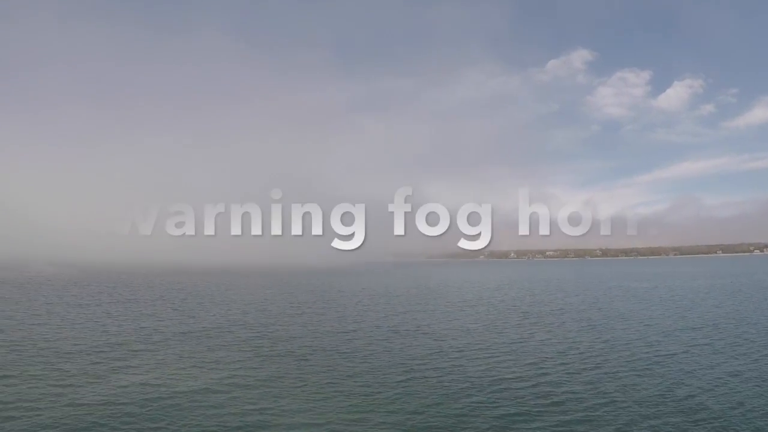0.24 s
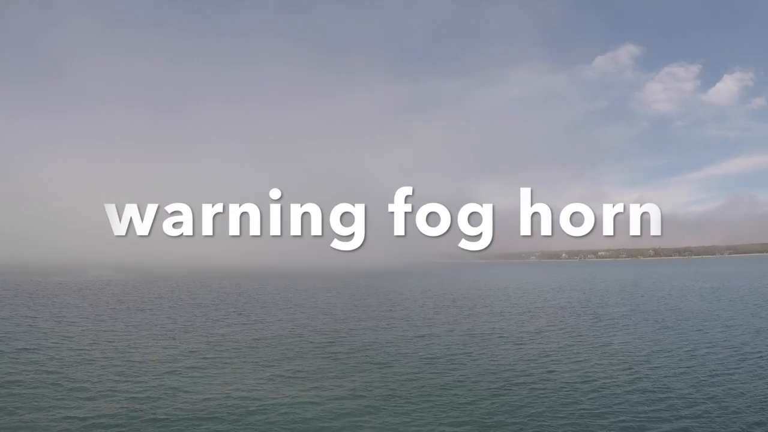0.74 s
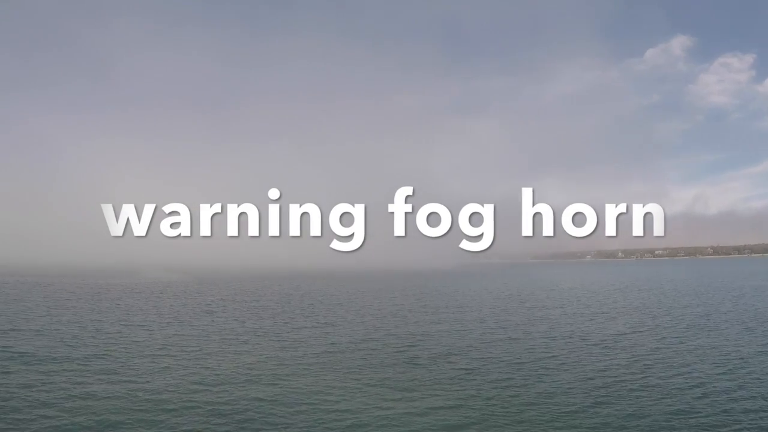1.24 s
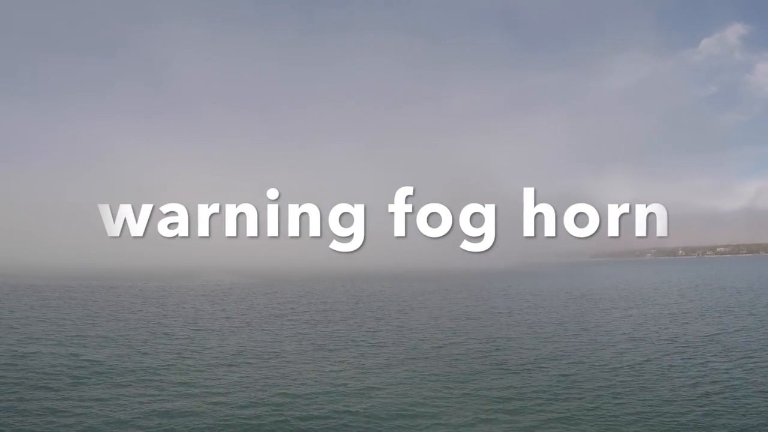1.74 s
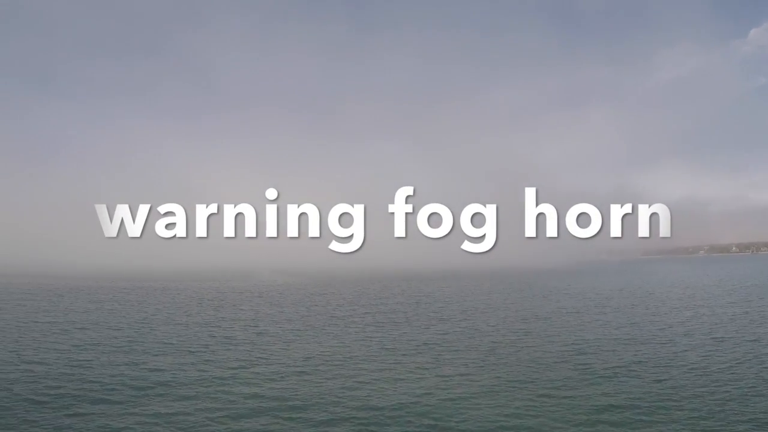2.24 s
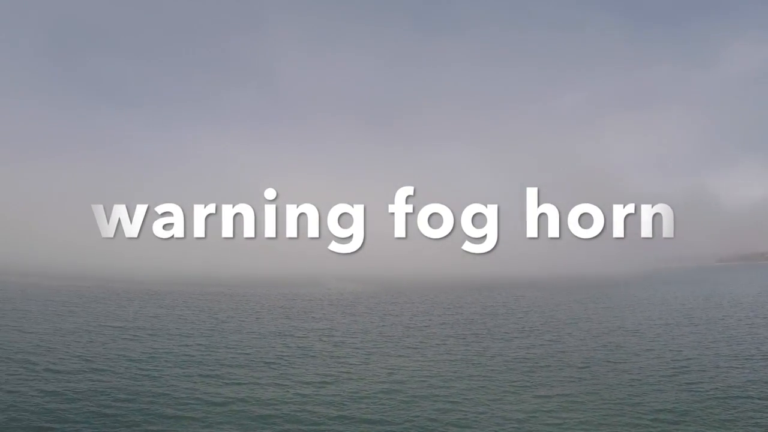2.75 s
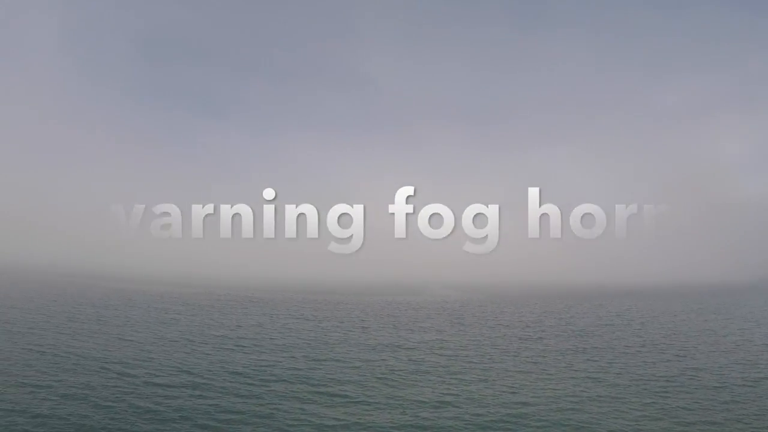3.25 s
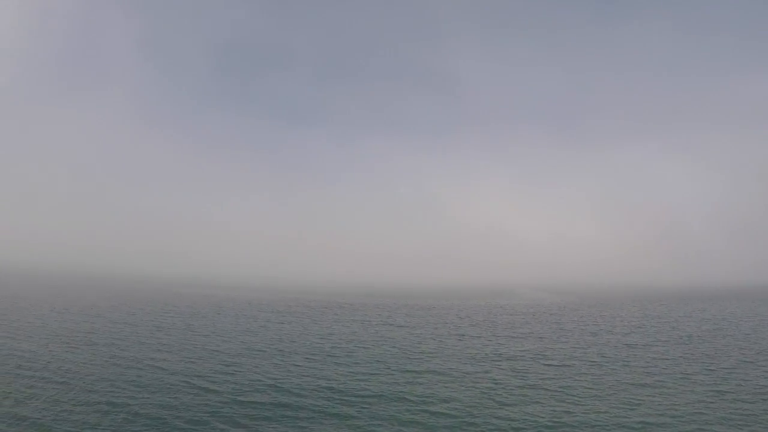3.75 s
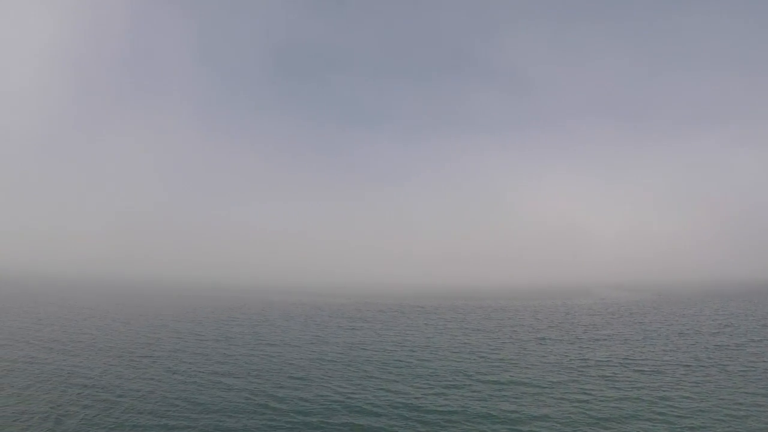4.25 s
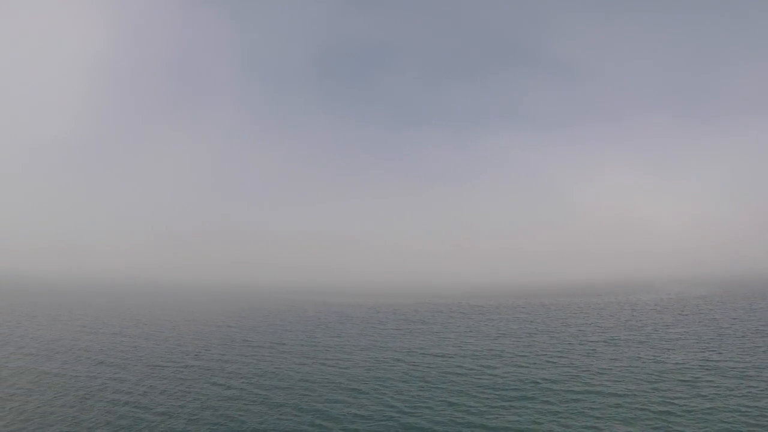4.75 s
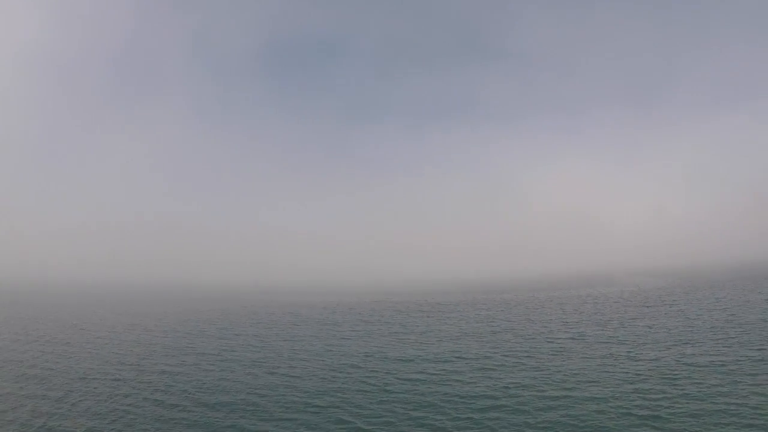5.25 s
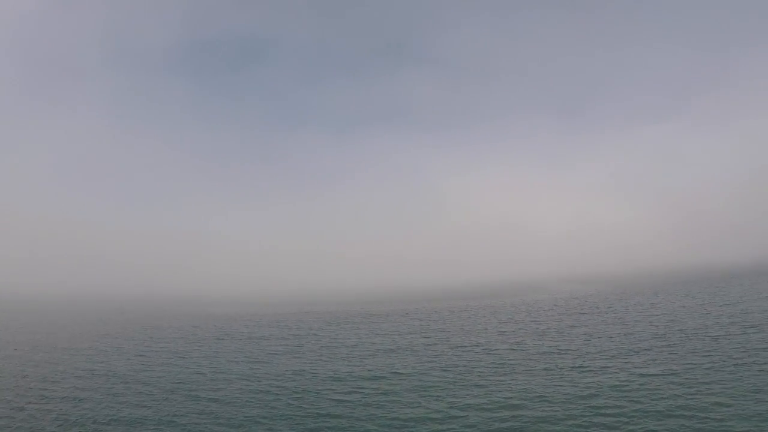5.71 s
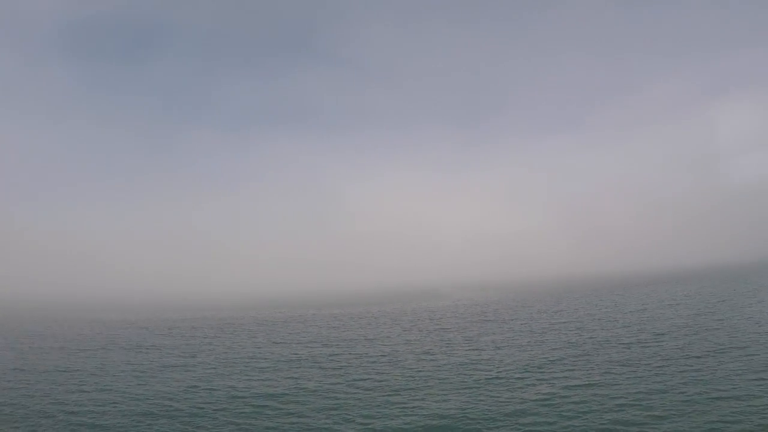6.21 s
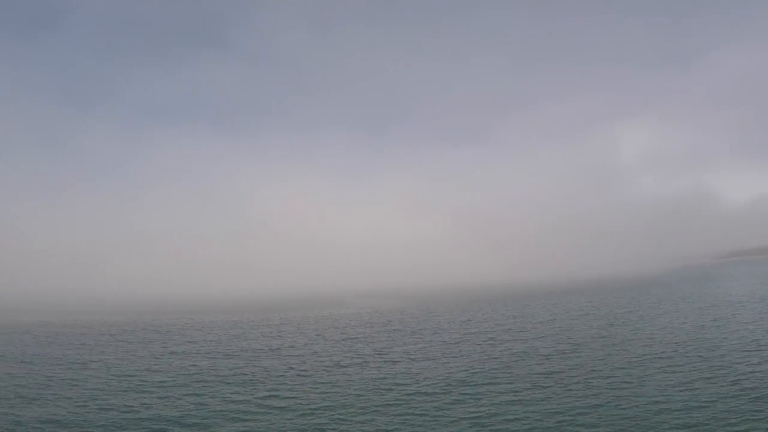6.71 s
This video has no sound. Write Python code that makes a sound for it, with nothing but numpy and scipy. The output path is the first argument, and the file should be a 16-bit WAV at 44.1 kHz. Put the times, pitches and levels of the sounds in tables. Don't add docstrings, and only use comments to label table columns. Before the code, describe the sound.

Open ship's deck over foggy water, with a bare microphone in strong wind. From 0 to 0.2 s several hard pops strike the microphone, over low, uneven rumbling and airy hiss. The gusts ease and return, with swells around 1.3 and 2 s, a lull near 2.5 s, and a faint, narrow fan hum behind. From about 3.4 s the wind hits more directly: throbbing low buffeting, a patter of small pops, and quick dry ticks from a loose fitting until about 4.6 s. At 4.7 s a powerful fog horn enters abruptly, bright and brassy for a fraction of a second, strongest near 5 s, then settling to one steady note around middle C. The wind quickly drops beneath it. Gusts add rough fuzz and flutter to the tone while its upper overtones fade in and out. The blast is still sounding when it cuts off near 7 s.

```python
import sys
import numpy as np
from scipy import signal
from scipy.fft import rfft, irfft, next_fast_len
from scipy.io import wavfile
from scipy.ndimage import uniform_filter1d, map_coordinates

SR = 44100
rng = np.random.default_rng(int(sys.argv[2]) if len(sys.argv) > 2 else 0)


def transcribe(u):
    v = np.clip(np.atleast_2d(u).T, -1, 1)
    q = np.round(v * 32767).astype(np.int16)
    wavfile.write(sys.argv[1], SR, q)


def volts(x):
    e = np.asarray(x, float) / 20
    return 10 ** e


N = 307377
T = np.arange(N) / SR


def unit(x):
    return x / np.sqrt(np.mean(x ** 2) + 1e-20)


def along(points, hz):
    f, v = np.transpose(points)
    return np.interp(np.log(hz + 1), np.log(f + 1), v)


def curves(rows):
    s, *cols = np.transpose(rows)
    return [np.interp(T, s, c) for c in cols]


def wobble(rate):
    steps = np.arange(0, N + 64, 64)
    knots = rng.standard_normal(400)
    drift = map_coordinates(knots, [steps * min(rate, 50) / SR])
    return np.interp(np.arange(N), steps, drift)


def rush(spectrum, patchy_db):
    z = signal.stft(rng.standard_normal(N + 512), nperseg=512)[2]
    patches = uniform_filter1d(rng.standard_normal(z.shape), size=6, axis=0)
    patches = uniform_filter1d(patches, size=10, axis=1)
    noise = signal.istft(z * volts(patchy_db * unit(patches)), nperseg=512)[1][:N]
    m = next_fast_len(N + 8192)
    hz = np.fft.rfftfreq(m, 1 / SR)
    inside = (hz > spectrum[0][0]) & (hz < spectrum[-1][0])
    colour = volts(along(spectrum, hz)) * inside
    return unit(irfft(rfft(noise, m) * colour, m)[:N])


# (time [s], level [dB])
BLOWING = [
    (4.69, -16),
    (4.71, -12),
    (4.725, -16.5),
    (4.8, -12.5),
    (4.93, -12),
    (5.0, -10.8),
    (5.1, -12.5),
    (6.5, -12),
    (6.7, -11),
]
HORN_START_S = BLOWING[0][0]


def horn():
    age = np.clip(T - HORN_START_S, 0, None)
    pitch_hz = 265.05 + 4 * np.exp(-age / 0.09)
    turn = 2 * np.pi * np.cumsum(pitch_hz) / SR
    blare = np.exp(-age / 0.23)
    fundamental = volts(curves(BLOWING)[0] + 0.47 * wobble(12)) * np.cos(turn)
    tone = fundamental + overtones(age, turn, blare) + top_overtones(age, turn, blare, pitch_hz[-1])
    opening = np.clip(age / 0.012, 0, 1)
    return opening * (np.sqrt(2) * tone + volts(8 * blare) * overload_fuzz(turn))


# (start level [dB], end level [dB], one cancellation [s], other cancellation [s], width [s])
OVERTONES = [(-22.5, -25, 4.4, 7.11, .25), (-30.5, -36.5, 6.3, 6.53, .14), (-33.5, -57.5, 5.62, 6.6, .14),
             (-35.5, -47, 5.8, 6.55, 0.14), (-44, -52, 4.98, 6.45, 0.2), (-59, -51.5, 6.4, 5.7, 0.07),
             (-57.5, -55, 6, 6.45, 0.15), (-61.5, -53, 5.25, 5.95, 0.18), (-59.5, -50, 5.25, 5.55, 0.28),
             (-65, -59.5, 5.7, 6.5, 0.098), (-60.5, -60, 5.3, 6.92, .22), (-65.5, -58, 5.5, 5.95, .2),
             (-65.5, -70, 5.5, 8.8, .15)]


def overtones(age, turn, blare):
    speak_s = 0.01
    lag = 0.5 + 3 * np.exp(-(age / 0.37) ** 4)
    locked = {2: 0.4, 3: lag, 5: lag}
    bell_db = 8 * np.exp(-(age / 0.2) ** 4)
    bell_db -= 12 * np.exp(-((age - 0.3) / 0.11) ** 2)
    out = np.zeros(N)
    for k, (start_db, end_db, early, late, width) in enumerate(OVERTONES, start=2):
        dips = [np.hypot(T - s, 0.072 * width) / np.hypot(T - s, width) for s in (early, late)]
        fading = np.prod(dips, axis=0)
        level_db = np.interp(T, [HORN_START_S, N / SR], [start_db, end_db])
        level_db += (min(0.33 * k, 1.6) + 3 * blare) * wobble(25)
        level_db += 7 * blare * (k > 2) + bell_db * (k == 3)
        speaks = np.clip(age / (k * speak_s), 0, 1)
        phase = locked.get(k, 2.5 * wobble(1.5))
        out += volts(level_db) * speaks * fading * np.cos(k * turn + phase)
    return out


# (frequency [Hz], level [dB])
TOP_OVERTONES = [(3900, -66), (4300, -69), (5200, -73), (6300, -76), (7100, -70), (7900, -75), (9500, -90)]


def top_overtones(age, turn, blare, held_hz):
    out = np.zeros(N)
    for k in range(15, 36):
        fading = np.abs(1 + 0.85 * np.exp(2.4j * wobble(4))) / 1.8
        level_db = along(TOP_OVERTONES, k * held_hz) + 7.9 * blare - 0.1 * k * age
        out += volts(level_db) * fading * np.cos(k * turn + 2.9 * wobble(2.4))
    return out


# (rate [Hz], level [dB per Hz])
SHAKE = [(15, -19), (35, 2.5), (55, -5), (85, -8), (105, -20), (130, -49)]
# (time [s], level [dB], overtone hit hardest [number])
CAPSULE_GUSTS = [(4.77, -47, 7), (4.93, -36, 3.1), (5.12, -39, 2), (5.55, -33, 1.5), (5.86, -48, 4.5),
                 (5.9, -47, 3), (6.03, -45, 4), (6.09, -48.5, 6), (6.18, -39, 2.2), (6.33, -39.5, 2.2),
                 (6.42, -45, 2.1), (6.62, -39.5, 2), (6.7, -38.5, 2.4), (6.76, -40.5, 2.7)]


def overload_fuzz(turn):
    gust_s, loss_db = 0.034, 10.5
    steady_db = [-48.5, -48.5, -55.0, -74.5, -58.0, -67.0, -64.5]
    shake = rush(SHAKE, patchy_db=1.5) + 1j * rush(SHAKE, patchy_db=1.5)
    out = np.zeros(N)
    for k, db in enumerate(steady_db, start=1):
        strength = volts(db)
        for s, gust_db, hardest in CAPSULE_GUSTS:
            strength = strength + volts(gust_db - loss_db * abs(k - hardest)) * np.exp(-((T - s) / gust_s) ** 2)
        smear = strength * np.roll(shake, k * SR // 3)
        out += np.real(smear * np.exp(1j * k * turn))
    return out


# (time [s], peak [dB], width [ms])
BUMPS = [(0.022, -18, 0.69), (0.027, -14, 1.8), (0.0331, -14, 0.97), (0.0349, -19, 0.26),
         (0.076, -26, 0.57), (0.118, -22, 0.74), (0.148, -15.5, 1.1), (0.172, -26, 0.3), (0.198, -13, 0.5),
         (3.58, -23, 0.37), (3.684, -24, 0.34), (3.705, -22, 0.56), (3.79, -19.5, 0.27), (4.027, -19, 0.52),
         (4.55, -21.5, 0.37)]


def pops():
    out, t = np.zeros(N + SR), np.arange(-300, 300) / SR
    when, size, wide = rng.random(size=(60, 3)).T
    patter_s = 3.45 + (4.68 - 3.45) * when
    patter_db = -30 + 3 * (2 * size - 1)
    patter_ms = 0.39 * (0.5 + wide)
    for s, db, width_ms in [*BUMPS, *zip(patter_s, patter_db, patter_ms)]:
        u = 1000 * t / width_ms
        dip = (1 - 0.6 * u ** 2) * np.exp(-u ** 2 / 2)
        out[round((s + 0.0012) * SR) - 300:][:len(t)] -= volts(db + 3) * dip
    return out[:N]


# (time [s], peak [dB], pitch [Hz])
TICKS = [(3.3809, -28, 1810), (3.466, -23.5, 1870), (3.5688, -26.5, 1790), (3.6892, -28.5, 1850),
         (3.757, -32.5, 1600), (3.798, -26, 1630), (3.8444, -29, 1850), (3.8885, -27, 1730),
         (3.92, -40, 1450), (3.985, -26, 1690), (4.074, -30, 1450), (4.155, -35.5, 1600),
         (4.265, -40, 2660), (4.436, -33, 1600), (4.525, -23, 1380), (4.524, -31.5, 2600),
         (4.593, -37, 2700), (4.885, -37, 1780), (5.5762, -39, 1850)]


def ticks():
    out, t = np.zeros(N + SR), np.arange(SR // 20) / SR
    for s, db, hz in TICKS:
        ratios = np.array([0.87, 1, 1.13]) + rng.normal(0, 0.03, 3)
        swing = sum(np.sin(2 * np.pi * hz * ratio * t) for ratio in ratios)
        decay = volts(db - 0.5 - 60 * t / 0.022)
        out[round(s * SR):][:len(t)] += decay * (1 - np.exp(-t / 0.0005)) * swing
    return out[:N]


# (time [s], strength [dB], grazing share that turns roar into hiss [0-1])
GUSTS = [(0.04, -51, 0.26), (0.2, -56.5, 0.3), (0.46, -51.5, 0.35), (0.9, -59.5, 0.28), (1.06, -60, 0.26),
         (1.33, -48, 0), (1.5, -54, 0.48), (1.72, -48, 0.44), (2.05, -46, 0.79), (2.46, -57.5, 0.42),
         (2.88, -56.5, 0.26), (3.0, -48.5, 0.46), (3.55, -45.5, 0.48), (4.0, -51, 0.08), (4.68, -48.5, -.1),
         (5.75, -52.5, .4), (6.22, -48, 0.87), (6.4, -51.5, 0.1)]
# (time [s], share [0-1])
FACING = [(0, 0.45), (.3, 0.3), (.68, 0.37), (1.06, 0), (1.36, 0.34), (1.9, 0), (2.05, 0.52), (2.5, 0.13),
          (2.8, 0.2), (2.95, 0.54), (3.34, 0.88), (4.1, 1), (4.3, .7), (4.45, 1.02), (4.7, 1), (5.3, 0.8),
          (6.2, 0.93), (6.97, 0.8)]


def since_horn(settle_s):
    return 1 - np.exp(-np.clip(T - HORN_START_S, 0, None) / settle_s)


def wind():
    air_db, grazing = curves(GUSTS)
    facing, = curves(FACING)
    ducked = since_horn(0.12)
    snapped, sunk = since_horn(0.015), since_horn(0.3)
    eddies = wobble(45)
    upper = flutter(facing, grazing, eddies) + roar(air_db, grazing, ducked, eddies)
    upper += hiss(air_db, eddies) + spray(air_db, facing, eddies) + fan()
    return volts(-6.5 * snapped - 7.5 * sunk) * port_swings(facing, sunk) + volts(-12 * ducked) * upper


def turned_db(facing, away_db, into_db):
    return away_db + (into_db - away_db) * facing + 1.5 * wobble(9)


# (frequency [Hz], level [dB per Hz])
HEAVE = [(12, -11), (25, -4), (45, -6.5), (60, -10), (90, -31)]
THROB = [(35, -24), (55, -1), (75, 1.5), (115, -0.5), (150, -13), (220, -56)]


def port_swings(facing, sunk):
    throb = rush(THROB, patchy_db=-1.5)
    envelope = np.abs(signal.hilbert(throb, next_fast_len(N))[:N] + 1e-3)
    throb = unit(throb / envelope ** 0.14)
    heave = rush(HEAVE, patchy_db=-0.1)
    heave_db = turned_db(facing, -21, -31) + 6.8 * sunk
    return volts(turned_db(facing, -28, -17.5)) * throb + volts(heave_db) * heave


# (frequency [Hz], level [dB per Hz])
FLUTTER = [(100, -12), (160, 3.5), (250, -1.5), (400, -7.5), (700, -16), (1100, -31.5), (2000, -38)]


def flutter(facing, grazing, eddies):
    level_db = turned_db(facing, -41, -38) + 4 - 3 * grazing
    return volts(level_db) * unit(volts(0.77 * eddies) * rush(FLUTTER, patchy_db=-1.0))


# (frequency [Hz], level [dB per Hz])
ROAR = [(450, -30), (700, -2), (1000, -1.5), (1400, 0), (1900, -2), (2400, -7.5), (2900, -14),
        (3400, -40.5)]


def roar(air_db, grazing, ducked, eddies):
    level_db = air_db + 11 - 10 * grazing - 3 * ducked
    return volts(level_db) * unit(volts(0.53 * eddies) * rush(ROAR, patchy_db=2.0))


# (frequency [Hz], level [dB per Hz])
HISS = [(2500, -29), (3050, -7.5), (3600, 0.5), (4200, 0.5), (5200, -6), (6200, -11.5), (7500, -25),
        (9000, -46.5)]


def hiss(air_db, eddies):
    return volts(air_db) * unit(volts(0.64 * eddies) * rush(HISS, patchy_db=1.1))


# (frequency [Hz], level [dB per Hz])
SPRAY = [(4500, -19), (5800, -3.5), (7000, -2), (7900, -10), (9000, -13.5), (10700, -24), (14000, -50.5)]


def spray(air_db, facing, eddies):
    level_db = -60 + 1.1 * (air_db - air_db.mean()) - 4 * facing + 1.1 * wobble(7.2)
    return volts(level_db) * unit(volts(0.93 * eddies) * rush(SPRAY, patchy_db=1.2))


# (frequency [Hz], level [dB per Hz])
FAN = [(570, -28), (612, -1), (650, -6.5), (690, -31.5)]


def fan():
    return volts(-55.5) * rush(FAN, patchy_db=-1.0)


def scene():
    fade_in = np.clip(T / 0.003, 0, 1)
    return (horn() + pops() + ticks() + fade_in * wind())[None]


def band_limit(x):
    return signal.sosfilt(signal.butter(12, 14190, fs=SR, output="sos"), x)


def record(dry):
    soft = dry / (1 + np.abs(dry / 0.56) ** 8) ** (1 / 8)
    return band_limit(soft)


dry = scene()
out = record(dry)
transcribe(out)
```